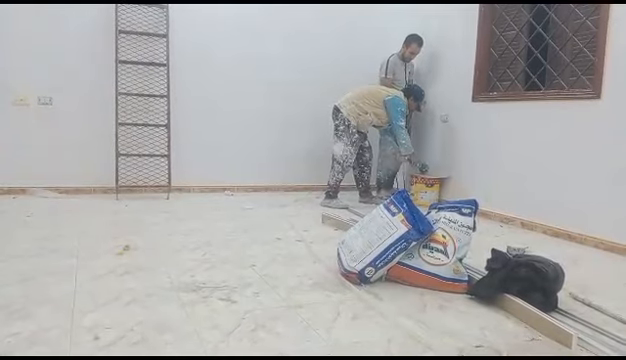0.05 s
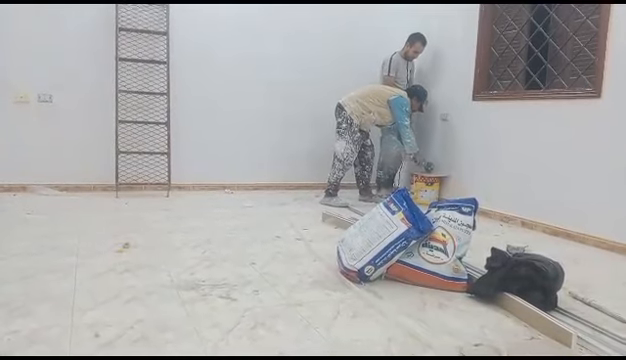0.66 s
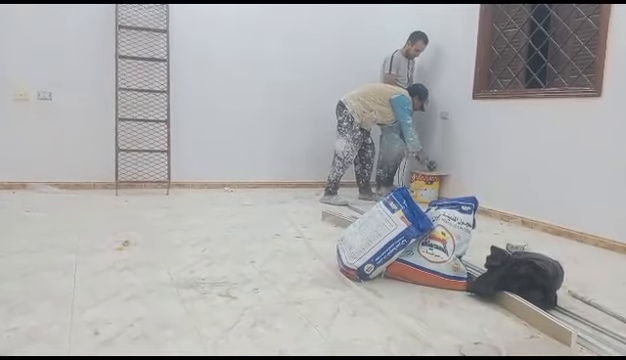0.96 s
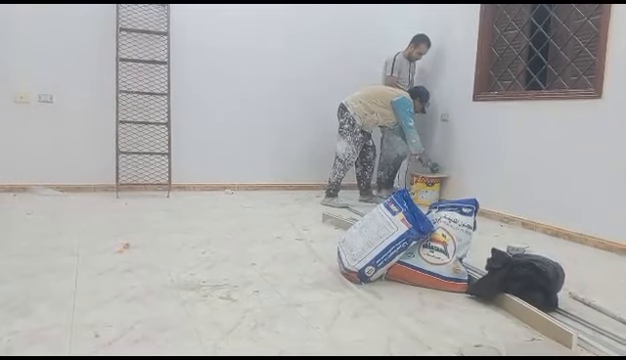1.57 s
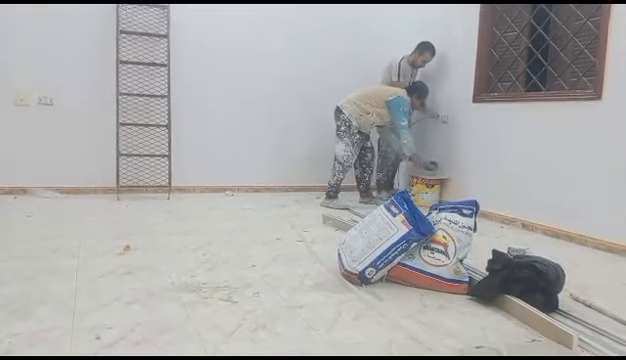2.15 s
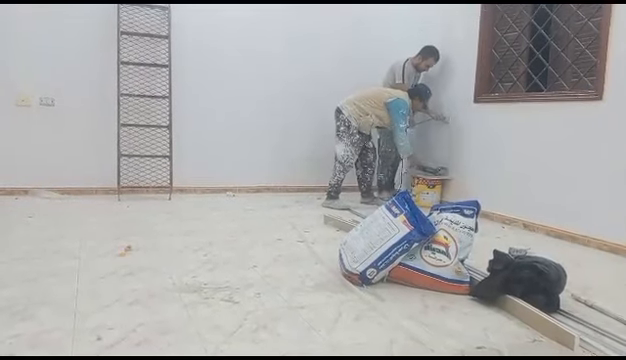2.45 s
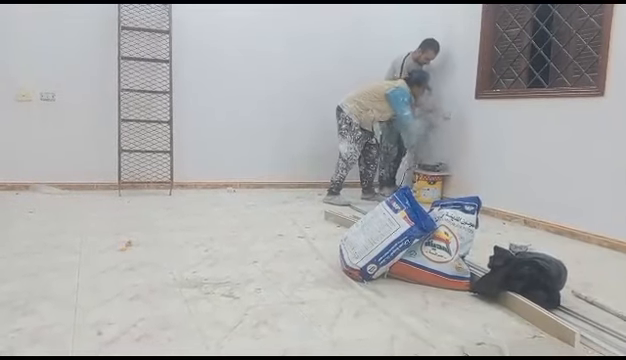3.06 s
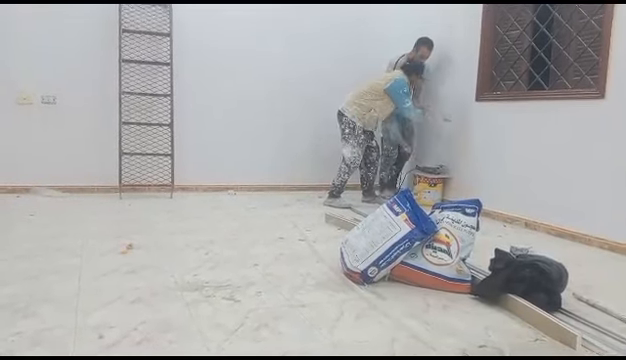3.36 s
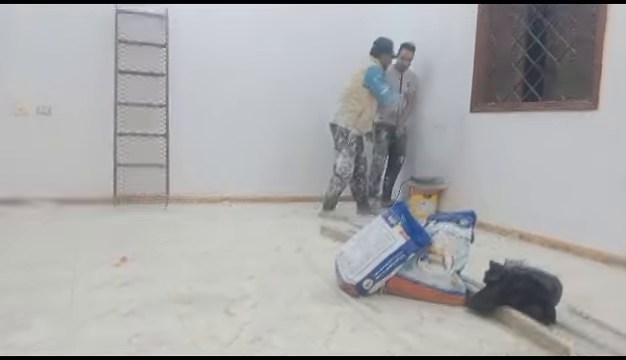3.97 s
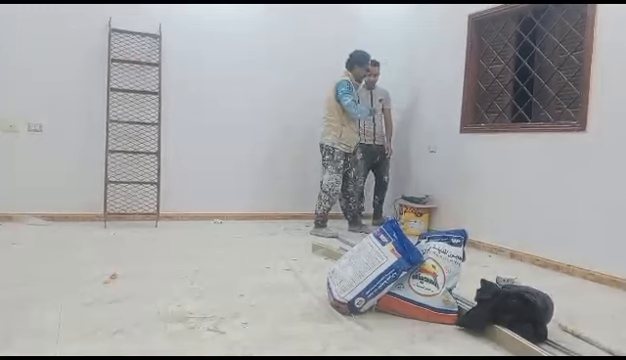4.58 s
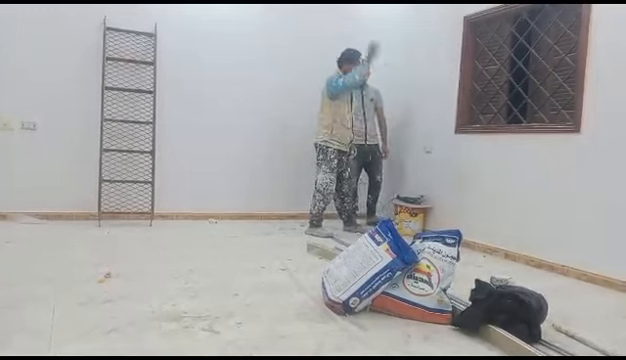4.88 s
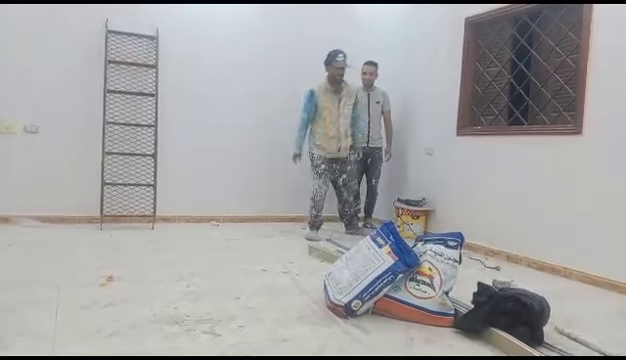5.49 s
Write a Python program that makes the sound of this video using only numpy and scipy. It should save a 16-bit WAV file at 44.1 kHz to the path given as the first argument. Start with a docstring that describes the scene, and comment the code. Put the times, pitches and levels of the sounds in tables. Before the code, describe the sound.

In a bare room, a rasping angle grinder coasts to a stop, followed by knocks, faint shuffling and a loud, tile-like crash.

```python
"""Angle grinder winding down, then a crash

An angle grinder coasts to a stop in a bare, echoing room, several metres from a phone. Its rubbing
disc rings in pairs of tones that close up as it slows. It is set down with three main knocks, clothes
and shoes scuff, then something hard, likely a tile offcut, crashes down and its pieces skitter."""
import sys
import numpy as np
from scipy import signal
from scipy.fft import rfft, irfft, next_fast_len
from scipy.io import wavfile
from scipy.ndimage import uniform_filter1d

SR = 44100
rng = np.random.default_rng(int(sys.argv[2]) if len(sys.argv) > 2 else 0)


def store_wav(level_fs):
    """Save 16-bit WAV to argv[1]."""
    pcm = np.round(np.clip(np.atleast_2d(level_fs), -1, 1) * 32767)
    wavfile.write(sys.argv[1], SR, pcm.T.astype(np.int16))


N = 248440
LEAD = SR  # one second of pre-roll, so the grinder already fills the room
TIME = np.arange(-LEAD, N) / SR

# bending modes of the disc: (pitch at rest [Hz], shift either way at full speed [Hz], width [Hz],
# relative level rubbed [dB], relative level struck [dB])
DISC_MODES = [(1819, 60, 46, -12, -32), (2210, 90, 330, -9.5, -7), (2760, 170, 360, -3.5, 0.5),
              (3563, 240, 47, -11.5, -18), (4880, 330, 210, -8.5, -19), (6049, 410, 120, -7.5, -37),
              (7730, 560, 83, -13.5, -37), (9870, 560, 31, -13.5, -22), (12500, 700, 160, -27.5, -40),
              (15000, 850, 170, -24, -46)]


def grinder(full_speed_hz=67.65, coast_s=1.55, release_s=1.836, throb=0.79, knee_hz=3000):
    """Grit rubs the slowing disc, harder once a turn, and shakes disc and housing."""
    # the hand eases or bears down for a moment: (time [s], level change [dB], half-width [s])
    presses = [(0.29, -5, 0.017), (1.39, 2.5, 0.061)]
    # gritty rasp: (frequency [Hz], relative level [dB])
    rasp_eq = [(45, -17), (135, -29), (168, -7), (215, -11.5), (600, -11.5), (980, -0.5), (1250, -6.5),
               (1850, -1.5), (2420, -11.5), (2750, 2), (3500, -3), (4800, 1), (7000, -8.5), (10000, -14),
               (15000, -15)]
    # gearbox and guard resonances, each shaken most at one speed: (pitch [Hz], width [Hz],
    # relative level [dB], favoured speed [share of full], speed spread [share of full])
    housing_modes = [(248.5, 60, -16.5, 0.038, 0.27), (397.2, 64, -7, 0.64, 0.29),
                     (474, 170, -10.5, 0.101, 0.07), (770, 46, -13, 0.59, 0.15),
                     (989, 33, -9.5, 0.31, 0.47), (1080.6, 103, -11.5, 0, 0.65),
                     (1368, 36, -14.5, 0.067, 0.18), (1522, 75, -8, 0.95, 0.48),
                     (1900, 22, -21, 0.18, 0.08), (2144, 63, -1, 0.58, .15), (2305, 40, -5.5, 1, 0.23),
                     (2574, 55, -4.5, 0.35, 0.16), (2640, 35, 4, 0.29, 0.17), (2830, 19, -1, 0.84, 0.14),
                     (3003, 70, -4, 0.86, 0.11), (3282, 120, 1, 0.6, 0.32), (3522, 120, 1.5, 0.59, 0.28),
                     (3810, 24, -3, 0.23, 0.081), (5300, 35, -6.5, .9, 0.24)]
    # friction brakes the disc almost evenly to a crawl; speeds are shares of full speed
    start_speed, crawl_speed = .92, .045
    spin = crawl_speed + (start_speed - crawl_speed) * (1 - ramp(0, coast_s)) ** 1.22
    phase_per_hz = 2 * np.pi * np.cumsum(spin) / SR
    wobble = 1 + throb * np.sqrt(spin) * np.cos(full_speed_hz * phase_per_hz)
    rub = grains(rate=5000, spread_db=3) * wobble
    sound = colour(rub, rasp_eq)
    for hz, shift_hz, width, db, _ in DISC_MODES:
        # the bending pattern turns with the disc, so each mode splits into a pair of tones
        sound += amp(db) * ring(rub, hz, width) * np.sqrt(2) * np.cos(shift_hz * phase_per_hz)
    shake = noise()
    for hz, width, db, speed, spread in housing_modes:
        # each resonance catches and lets go on its own, so the squeals chatter
        squeal_db = db - 3 + 3 * wander(step_s=.04)
        near_speed = np.exp(-.5 * ((spin - speed) / spread) ** 2)
        sound += amp(squeal_db) * ring(shake, hz, width) * near_speed
    # the level holds until the hand lets up, then drops a step and fades
    released = ramp(release_s, 0.23)
    rub_db = -16.5 - 3.5 * released - 36.5 * np.maximum(TIME - release_s, 0)
    rub_db += sum(db * bump(s, length) for s, db, length in presses)
    # slower grit strikes more softly: the treble goes first, more so once it stops biting
    bite_lost = ramp(1.39, 0.14)
    tilt_db_per_octave = 5.5 * spin - 11.5 * bite_lost - 18 * released
    octaves = bands(sound, knee_hz * 2. ** np.arange(4))
    return sum(band * amp(rub_db + k * tilt_db_per_octave) for k, band in enumerate(octaves))


def set_down():
    """Each knock thuds, clacks the housing, scratches the rim and rings the resting disc and its guard."""
    # the grinder lands: (time [s], thud [dB], clack [dB], disc edge hit [dB], contact [s])
    knocks = [(2.587, -6, -13.5, -24, 0.0068), (2.747, -4.5, -14.5, -18.5, 0.0066),
              (2.795, -15.5, -19, -26, 0.015), (2.972, -20.5, -29.5, -15.5, 0.0043),
              (3.083, -32, -33, -30, 0.003)]
    # clink of the steel guard: (pitch [Hz], width [Hz], relative level [dB])
    guard_modes = [(2230, 40, -17.5), (2753, 11, -11.5), (5080, 16, -16), (5900, 24, -22)]
    # surface underneath, housing and gritty rim, each: (frequency [Hz], relative level [dB])
    thud_eq = [(30, -33), (62, -10.5), (120, -14.5), (175, -4.5), (225, -2), (280, 2), (345, 3), (395, 7),
               (470, -5), (620, -11.5), (770, -8.5), (1000, -11), (1300, -25), (3000, -54)]
    clack_eq = [(100, 0), (600, 3), (1300, -2), (1750, 5), (2600, 5), (3500, 1), (5000, -14.5), (7500, -19),
                (10000, -27), (15000, -28)]
    rim_eq = [(1000, -31), (4500, 7), (7500, 0), (10000, -6), (15000, -18)]
    times, thud_db, clack_db, edge_db, contacts = np.transpose(knocks)
    edge = blows(times, edge_db, contacts)
    disc = sum(amp(db) * ring(edge, hz, width) for hz, _, width, _, db in DISC_MODES)
    rim = amp(-4.5) * colour(edge, rim_eq)
    guard = sum(amp(db) * ring(edge, hz, width) for hz, width, db in guard_modes)
    thud = colour(blows(times, thud_db, contacts), thud_eq)
    clack = colour(blows(times, clack_db, contacts), clack_eq)
    return thud + clack + disc + rim + guard


def crash(skitter_peak_s=0.18, rise_db_per_s=34, settle_db_per_s=280):
    """A slab lands and bounces; its pieces skitter ever harder, then settle quickly."""
    # the hit and its bounces: (time [s], level [dB], contact [s])
    impacts = [(5.1936, -1, 0.0021), (5.209, -18, 0.0019), (5.227, -8, 0.0063), (5.25, -19, 0.0032),
               (5.266, -10.5, 0.0013), (5.298, -27, 0.0017), (5.395, -16, 0.001), (5.539, -42, 0.0043)]
    # ring of the slab and of its shards, each: (frequency [Hz], relative level [dB])
    slab_eq = [(40, -21), (90, -6), (170, 0), (430, 4.5), (620, 6.5), (730, 15), (860, 12), (1050, 4),
               (1560, 5.5), (2400, 0.5), (3000, -2.5), (3900, -11), (5000, -52), (15000, -60)]
    shards_eq = [(30, -14), (70, -25), (140, 3.5), (500, -4), (800, -4), (1300, -6), (2800, -4.5),
                 (3700, 0), (5000, -4.5), (6300, -9), (9000, -13.5), (15000, -20)]
    break_s = impacts[0][0] + 0.0029  # pieces break loose just after the hit
    past_peak = TIME - break_s - skitter_peak_s
    skitter_db = -15.5 - np.maximum(-rise_db_per_s * past_peak, settle_db_per_s * past_peak)
    pieces = grains(rate=4000, spread_db=8.5) * amp(skitter_db) * ramp(break_s, 0.0073)
    return colour(blows(*np.transpose(impacts)), slab_eq) + colour(pieces, shards_eq)


def shuffling():
    """Scuffs, footfalls and light taps of people shifting about."""
    # cloth and shoe scuffs, and soft footfalls, each: (time [s], level [dB], half-width [s])
    scuffs = [(2.33, -36.5, 0.032), (3.7, -47, 0.34), (3.95, -45, 0.089), (4.245, -38, 0.017),
              (4.45, -50, 0.066), (4.88, -41.5, 0.071), (4.96, -44.5, 0.033)]
    steps = [(4.02, -47.5, 0.036), (4.1, -47, 0.016), (4.27, -40.5, 0.02), (4.88, -41.5, 0.011)]
    # light taps on the floor: (time [s], level [dB], contact [s])
    taps = [(4.856, -33, 0.002), (4.884, -45, 0.0038)]
    # their tone colours, each: (frequency [Hz], relative level [dB])
    scuff_eq = [(200, -4), (1200, -11), (2300, 2), (3400, 2.5), (6300, -6), (10000, -8), (15000, -17)]
    step_eq = [(30, -15), (60, 9), (100, 3.5), (160, 4), (260, -5), (1000, -50)]
    tap_eq = [(80, -27), (420, 9.5), (850, 1), (1500, -1), (4000, -30)]
    movement = colour(swells(scuffs), scuff_eq) + colour(swells(steps), step_eq)
    return movement + colour(blows(*np.transpose(taps)), tap_eq)


def ticks(contact_s=0.00047):
    """Tiny dry ticks at the phone, too close for the room to answer."""
    # two tiny contacts: (time [s], level [dB])
    hits = [(4.193, -48), (4.222, -46)]
    # their dull tone: (frequency [Hz], relative level [dB])
    tick_eq = [(100, -4), (1500, -5), (3000, -10), (8000, -28)]
    times, dbs = np.transpose(hits)
    return colour(blows(times, dbs, np.full(len(times), contact_s)), tick_eq)


def room(x, direct_db=-14, early_db=-7, early_decay_s=0.042, echoes_per_s=500):
    """Weak direct sound, separate echoes off the near walls, then a long diffuse tail."""
    # reverb time of the bare room: (frequency [Hz], time to fall 60 dB [s])
    decay_times = [(60, 2.12), (250, 1.49), (400, 1.24), (700, 2.05), (2600, 1.46), (5500, 0.87),
                   (8300, 0.76), (15000, 0.43)]
    t = np.arange(2 * SR) / SR
    hz, t60 = np.transpose(decay_times)
    noise_bands = bands(rng.standard_normal(len(t)), hz)
    tail = sum(band * np.exp(-np.log(1000) * t / decay) for band, decay in zip(noise_bands, t60))
    tail *= np.sqrt(2 * np.log(1000) / (SR * t60.max()))  # unity gain where it rings longest
    arrivals = rng.random(len(t)) < echoes_per_s / SR
    echoes = arrivals * rng.standard_normal(len(t)) * np.exp(-t / early_decay_s)
    impulse = amp(-1.5) * tail + amp(early_db) * even(echoes, width_hz=67)
    impulse[0] += amp(direct_db)
    return signal.fftconvolve(x, impulse)[:len(x)]


def hiss(level_db=-49):
    """A faint, steady bed of noise."""
    # tone of the hiss: (frequency [Hz], relative level [dB])
    hiss_eq = [(25, -13), (60, -5.5), (200, 4.5), (700, -1), (1400, -2.5), (2400, 4.5), (3500, -3),
               (6300, -5), (10000, -14), (15000, -5.5)]
    return amp(level_db) * colour(noise(), hiss_eq)


def blows(times, dbs, contacts):
    """Rough contacts that build up and die away fast; 0 dB has the energy of 10 ms at full scale."""
    track, t = np.zeros(len(TIME)), np.arange(SR // 10) / SR
    for s, db, contact in zip(times, dbs, contacts):
        burst = even(rng.standard_normal(len(t)) * t * np.exp(-t / contact), width_hz=100)
        slot = track[LEAD + int(s * SR):][:len(t)]
        slot += amp(db) * np.sqrt(SR / 100) * burst[:len(slot)]
    return track


def grains(rate, spread_db):
    """Random clicks of uneven size, about `rate` a second; rms 1."""
    onsets = rng.random(len(TIME)) < rate / SR
    clicks = onsets * noise() * amp(spread_db * np.clip(noise(), -2, 2))
    return clicks / np.sqrt(np.mean(clicks ** 2))


def swells(rows):
    """Noise that swells and fades around each (time [s], level [dB], half-width [s])."""
    return noise() * sum(amp(db) * bump(s, length) for s, db, length in rows)


def noise():
    """White noise for the whole scene."""
    return rng.standard_normal(len(TIME))


def ring(x, hz, width):
    """A steep-sided resonance; white noise keeps its power."""
    b, a = signal.iirpeak(hz, hz / width, fs=SR)
    return signal.lfilter(b, a, signal.lfilter(b, a, x)) * np.sqrt(2 * SR / (np.pi * width))


def colour(x, eq):
    """Shape x with an EQ curve; white noise keeps its power."""
    impulse = response(eq)
    return signal.oaconvolve(x, impulse / np.linalg.norm(impulse))[:len(x)]


def response(eq, size=4096):
    """Minimum-phase impulse response of a (frequency [Hz], level [dB]) curve."""
    hz, db = np.transpose(eq)
    freqs = np.maximum(np.fft.rfftfreq(size, 1 / SR), 1)
    gain = amp(np.interp(np.log(freqs), np.log(hz), db))
    cepstrum = irfft(np.log(gain))
    cepstrum[1:size // 2] *= 2
    cepstrum[size // 2 + 1:] = 0
    return irfft(np.exp(rfft(cepstrum)))


def bands(x, centres):
    """Split x into overlapping bands that add up to x."""
    size = next_fast_len(len(x), True)
    spectrum = rfft(x, size)
    log_hz = np.log(np.maximum(np.fft.rfftfreq(size, 1 / SR), 1))
    weights = [np.interp(log_hz, np.log(centres), row) for row in np.eye(len(centres))]
    return [irfft(spectrum * weight, size)[:len(x)] for weight in weights]


def even(burst, width_hz):
    """Level out the spectrum of a random burst, keeping its timing; energy 1."""
    size = 2 * len(burst)
    spectrum = rfft(burst, size)
    power = uniform_filter1d(np.abs(spectrum) ** 2, max(1, int(width_hz * size / SR)))
    flat = irfft(spectrum / np.sqrt(np.abs(power) + 1e-12))[:len(burst)]
    return flat / np.linalg.norm(flat)


def wander(step_s):
    """Glide to a new random value every step_s; spread near 1."""
    levels = rng.standard_normal(size=1024)
    return np.interp((TIME - TIME[0]) / step_s, np.arange(len(levels)), levels)


def ramp(start_s, length_s):
    """Rise evenly from 0 to 1."""
    return np.clip((TIME - start_s) / length_s, 0, 1)


def bump(centre_s, half_width_s):
    """A bell-shaped rise to 1 and back."""
    return np.exp(-.5 * ((TIME - centre_s) / half_width_s) ** 2)


def amp(db):
    """Decibels to gain."""
    return 10 ** (np.asarray(db) / 20)


def scene():
    """The distant action is heard through the room; ticks and hiss stay dry."""
    far = room(grinder() + set_down() + crash() + shuffling())
    return (far + ticks() + hiss())[None, LEAD:]


def record(dry, top_hz=15750):
    """The phone thins the bass, colours the treble and cuts the top."""
    # phone microphone: (frequency [Hz], gain [dB])
    mic_eq = [(25, -22.5), (55, -8), (3700, -2.5), (4080, -11), (4450, -20.5), (5000, -14.5), (6300, -1.5),
              (7300, -11.5), (8500, -18.5), (11500, -17.5), (13500, -26.5), (15000, -22)]
    coloured = signal.oaconvolve(dry, response(mic_eq)[None], axes=1)[:, :N]
    return signal.sosfilt(signal.ellip(12, .2, 90, top_hz, fs=SR, output="sos"), coloured)


dry = scene()
out = record(dry)
store_wav(out)
```